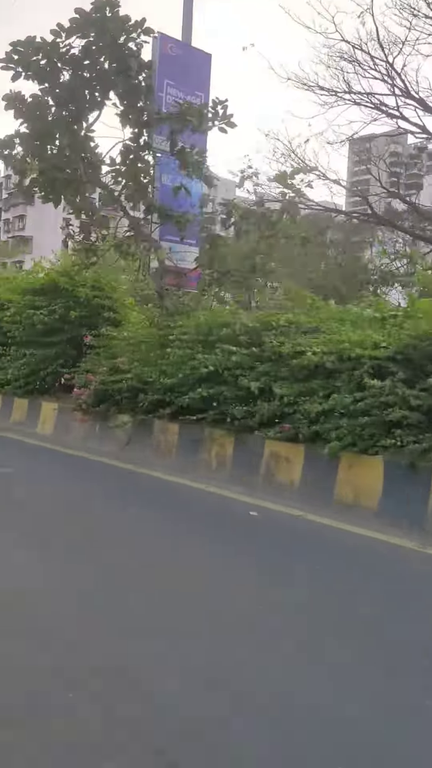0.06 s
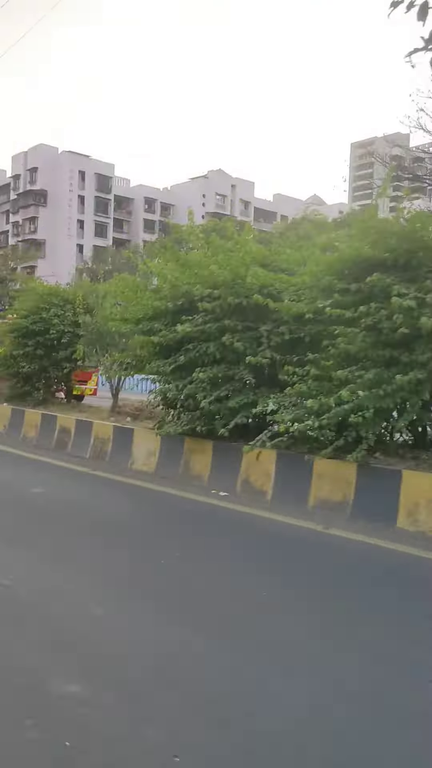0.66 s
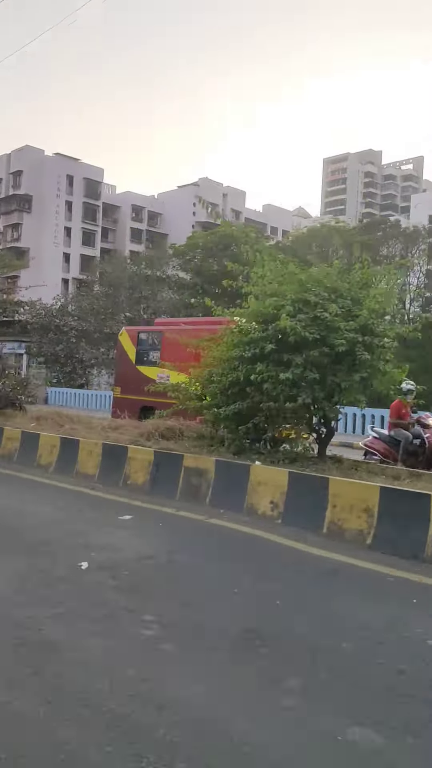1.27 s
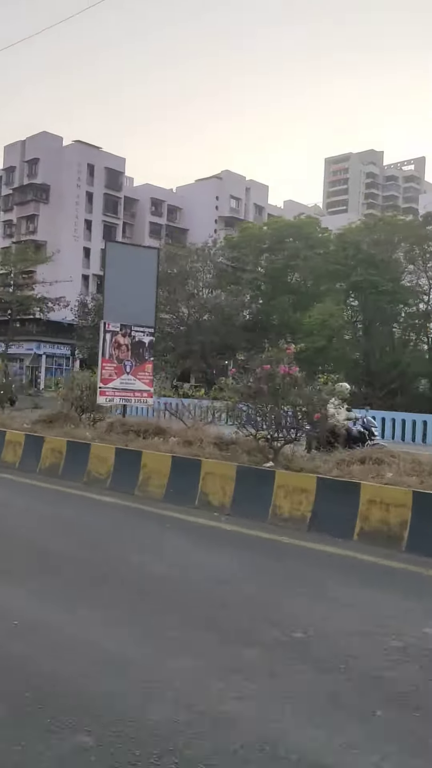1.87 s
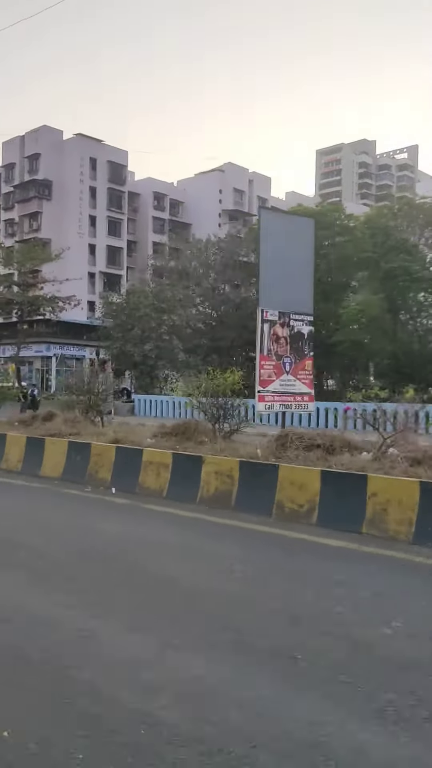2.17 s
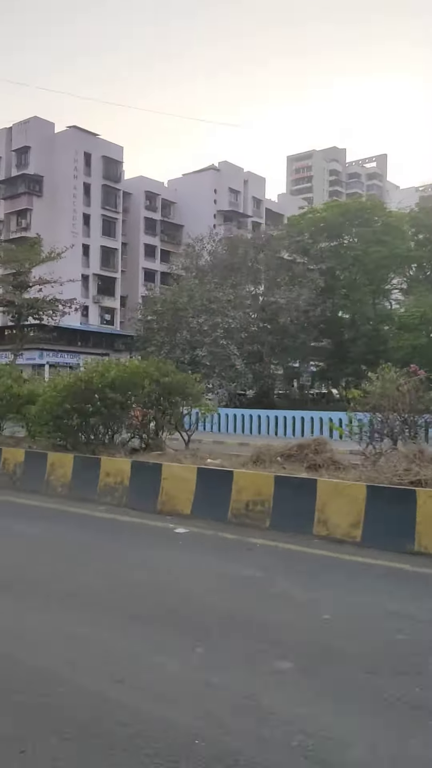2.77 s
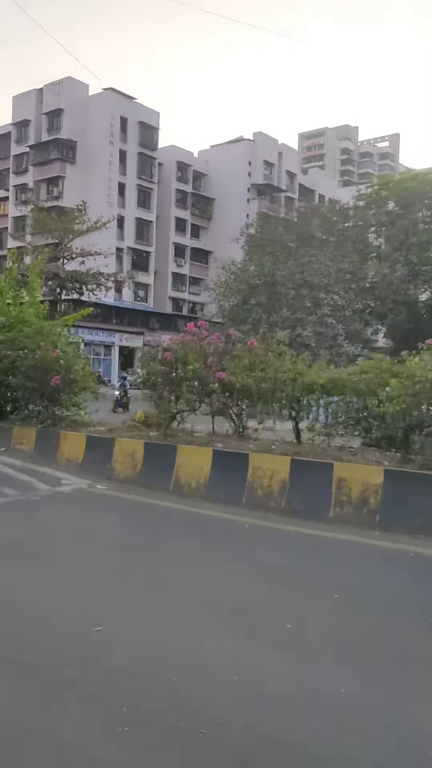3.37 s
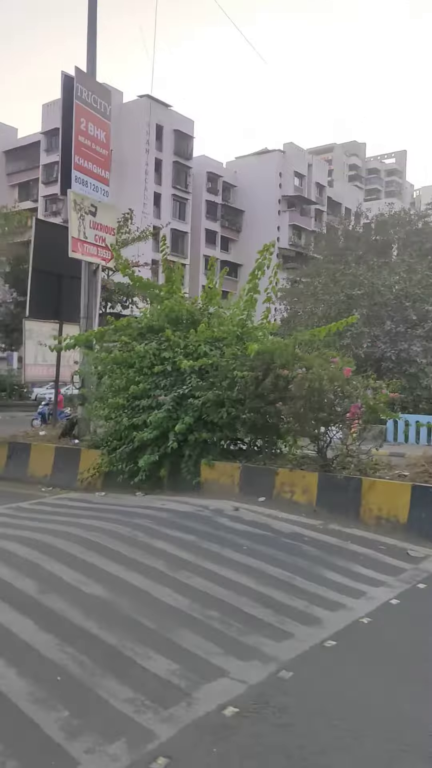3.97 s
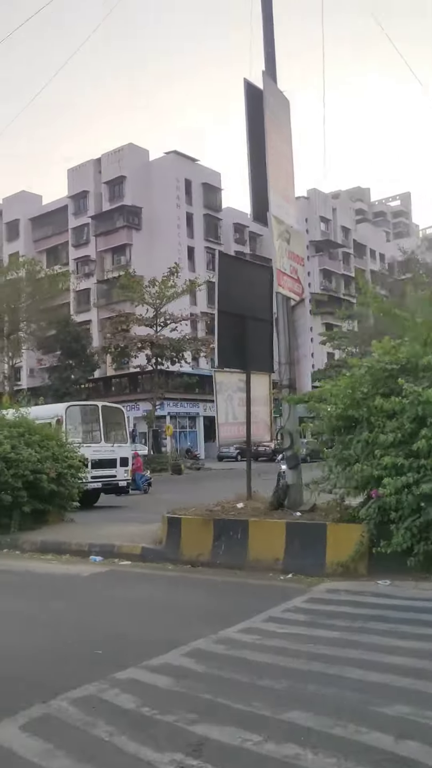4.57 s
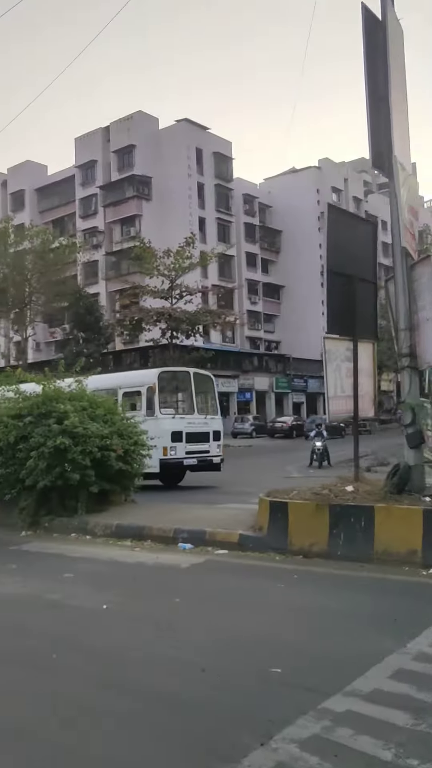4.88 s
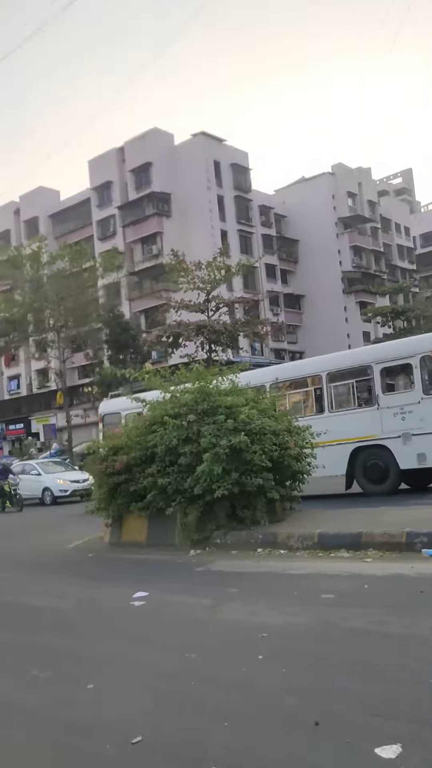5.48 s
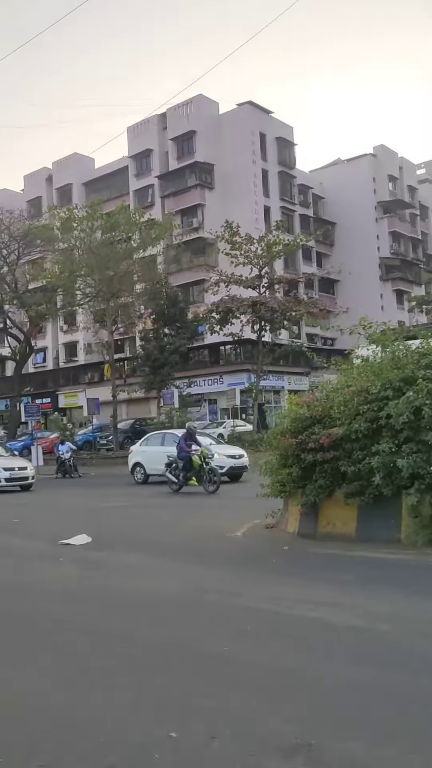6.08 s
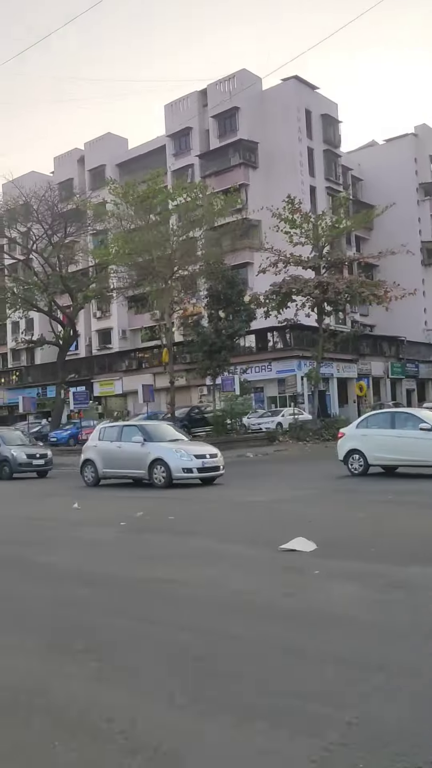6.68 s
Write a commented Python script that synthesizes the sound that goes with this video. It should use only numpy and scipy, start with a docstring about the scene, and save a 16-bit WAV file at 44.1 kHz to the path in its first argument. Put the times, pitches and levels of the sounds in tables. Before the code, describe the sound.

Inside a small open-sided vehicle on a city road, gusts thump and crackle on a phone's microphones over cabin rumble and tyre hiss. A horn toots twice as the wind eases. A brake squeals thinly and loose bodywork clacks. Then the throttle opens and the exhaust swells into a loud, low drone, with one more toot, turning to a rough bark with engine knock at the end.

```python
"""City ride in a small open-sided vehicle

Gusts buffet a phone's two microphones over the noise of tyres, cabin and gears. Horns toot, a spring
squeaks, a brake squeals, and loose parts clack and jingle. Then the throttle opens: the exhaust booms
in a loud, low drone that turns to a bark as the engine pulls and knocks."""
import sys
import numpy as np
from scipy import signal
from scipy.fft import rfft, irfft
from scipy.io import wavfile
from scipy.ndimage import uniform_filter1d

SR = 44100
rng = np.random.default_rng(int(sys.argv[2]) if len(sys.argv) > 2 else 0)


def generate_wav(signal):
    """Clip the signal to [-1, 1] and save it as 16-bit WAV at the path in sys.argv[1]."""
    frames = np.transpose(np.atleast_2d(signal))
    scaled = np.clip(frames, -1, 1) * 32767
    pcm = np.round(scaled).astype(np.int16)
    wavfile.write(sys.argv[1], SR, pcm)


N = 297013
TIME = np.arange(N) / SR

# How fast the engine fires: time_s, rate_hz
FIRING_RATE = [(4.4, 93), (4.8, 91), (5.07, 99.8), (5.3, 96.2), (5.58, 104), (5.89, 100.2), (6.02, 104),
               (6.27, 105.8), (6.45, 104), (6.73, 108.7)]
# The exhaust's deep boom, swelling as the throttle opens: time_s, level_db
BOOM_LEVEL = [(4.3, -26), (4.5, -21), (4.8, -27.5), (5.05, -12), (5.301, -12.5), (5.42, -10), (5.85, -11.5),
              (6.179, -11), (6.55, -19), (6.73, -19)]
# The exhaust's bark, growing as the engine works harder: time_s, level_db
BARK_LEVEL = [(4.6, -39.5), (5.9, -42), (6.07, -33.5), (6.45, -28), (6.68, -21.5)]
# Higher tones of the exhaust: multiple_of_firing_rate, share_of_boom_db, share_of_bark_db
EXHAUST_OVERTONES = [(1.5, -36.5, -14), (2.5, -25.5, -17), (3.5, -32.5, -13), (4, -27.5, -5.5),
                     (4.5, -40, -11.5), (5, -32.5, -15), (5.5, -45, -21), (6, -35, -18),
                     (6.5, -48.5, -19.5), (7, -35, -28), (7.5, -52.5, -26), (8, -44, -30.5),
                     (10, -49.5, -30)]
# Cabin panels buzzing along with one overtone: start_s, length_s, multiple_of_firing_rate, level_db
PANEL_BUZZES = [(4.98, 0.17, 4, -31.5), (5.328, 0.13, 3, -31.5), (5.3, 0.13, 4, -31), (5.72, 0.18, 6, -37),
                (5.925, 0.11, 6, -33), (5.882, 0.14, 5, -37)]
# The rasp of the engine's moving parts: time_s, relative_level_db
RASP_LEVEL = [(2.8, -63), (3.5, -45), (4.8, -38), (5.05, -34), (5.35, -32.5), (5.65, -39), (6.2, -36),
              (6.73, -33)]
# The rasp's mix of low and high sound: frequency_hz, gain_db
RASP_SPECTRUM = [(40, -26.5), (150, -3.5), (300, 1), (500, -0.5), (800, -8), (1250, -2), (1900, -8),
                 (2800, -9.5), (3300, -14.5), (4200, -25.5), (6300, -27.5), (8000, -43), (14000, -59.5)]
# The engine's high sizzle: frequency_hz, gain_db
SIZZLE_SPECTRUM = [(3000, -23), (4800, -8.5), (5800, 1.5), (6600, -2.5), (7200, -9), (7800, -17),
                   (10000, -18), (14000, -40)]
# Spells of engine knock: start_s, length_s, strength_db, highest_ring_boost_db
KNOCK_SPELLS = [(6.157, 0.054, -37, 3.5), (6.252, 0.053, -30.5, 0.5), (6.319, 0.036, -28.5, 7),
                (6.36, .028, -27, -3), (6.387, 0.11, -29, 7), (6.526, 0.076, -25.5, 2.5),
                (6.612, 0.11, -28, -2)]
# How the cylinder rings: pitch_hz, bandwidth_hz, gain_db, scatter_db, climb_hz_per_s
CYLINDER_RINGS = [(1600, 380, -5.5, 4, 200), (2540, 400, -2, 3, 540), (6720, 580, -14.5, 5, 0)]
# Gusts hitting the microphones: start_s, length_s, left_db, right_db
WIND_GUSTS = [(0.0, 0.065, -21.5, -15), (0.069, 0.05, -20, -11), (0.152, 0.027, -21.5, -13),
              (0.172, 0.04, -21, -11.5), (0.532, 0.033, -27, -13.5), (0.569, 0.1, -13, -11.5),
              (0.668, 0.096, -32, -17), (0.869, .02, -39, -20), (0.902, 0.087, -39, -21.5),
              (1.142, 0.078, -36, -19), (1.389, 0.015, -41, -13.5), (1.559, 0.019, -19, -45),
              (1.704, 0.026, -12.5, -38), (1.737, 0.024, -18, -36), (1.808, 0.056, -36, -18),
              (1.866, 0.059, -33, -11.5), (1.931, 0.082, -16, -27), (2.045, 0.038, -11, -15.5),
              (2.088, 0.053, -14.5, -16.5), (2.157, 0.043, -16, -15.5), (2.231, 0.035, -23, -13.5),
              (2.286, 0.087, -24, -38), (2.862, 0.2, -29, -19.5), (3.992, 0.076, -31, -25)]
# Swirling air at a microphone: frequency_hz, gain_db
WIND_SPECTRUM = [(20, -31), (50, -1.5), (100, 5.5), (170, 1.5), (350, -2.5), (600, -9), (1200, -26.5),
                 (2500, -39), (4000, -63), (6500, -59.5), (9000, -105.5)]
# The swirls that pop hardest: time_s, strength_db, left_minus_right_db, width_s
HARD_POPS = [(0.027, -8, -20, 0.0015), (0.045, -14, -16, 0.00029), (0.074, -11.5, -14, 0.0003),
             (0.085, -9, -18, 0.00032), (0.108, -10.5, -17, 0.00022), (0.164, -13, -12, 0.00029),
             (0.188, -9, -16, 0.00054), (0.307, -12.5, -24, 0.0011), (0.541, -7.5, -22, 0.00033),
             (0.570, -8.5, -15, .0005), (0.589, -9, -6, 0.00079), (0.620, -12, -12, 0.0003),
             (0.631, -8, -17, 0.00026), (0.636, -14, -15, 0.00032), (0.662, -14, -10, 0.00068),
             (0.742, -14.5, -13, 0.00048), (0.913, -8.5, -15, 0.002), (0.950, -7.5, -15, 0.002),
             (1.397, -14, -16, 0.00043), (1.706, -6, 20, 0.0017), (1.727, -5, 21, 0.00071),
             (1.832, -18, -18, 0.00035), (1.872, -7.5, -21, 0.00046), (1.884, -11, -18, 0.0004),
             (2.044, -4, 6, 0.0016), (2.068, -9, 0, 0.00088), (2.237, -12, -14, 0.00026),
             (2.248, -7, -14, 0.00077)]
# Horn toots: start_s, length_s, level_db, left_minus_right_db, treble_cut_db_per_khz
HORN_TOOTS = [(1.941, 0.098, -35, 2, 0.3), (2.157, 0.14, -39, 6.5, -0.3), (5.668, 0.13, -38, 4.5, -0.1)]
# Tones of the horn's buzzing diaphragm: multiple_of_pitch, gain_db
HORN_OVERTONES = [(2, 0), (3, 1), (4, 0), (5, -2.5), (6, -10), (7, 1.5), (8, -1), (9, -23), (10, -19.5),
                  (11, -15), (13, -16.5), (14, -21.5), (15, -14.5), (16, -17), (17, -22.5), (20, -22.5),
                  (26, -37), (28, -21.5), (32, -37), (37, -24.5)]
# The rattle of the horn's metal disc: frequency_hz, gain_db
RATTLE_SPECTRUM = [(400, -15), (900, -6), (1800, -4.5), (3200, 4), (4200, -10.5), (6300, -4), (7800, -18),
                   (15000, -14)]
# Blows on loose bodywork: time_s, peak_db, left_minus_right_db, treble_cutoff_hz
BODY_CLACKS = [(1.0145, -13, -11, 6500), (1.4485, -15, -12, 4500), (4.5604, -5, -12, 8000),
               (4.5635, -14.5, -12, 6000), (4.5673, -21, -12, 6000), (4.662, -15, -6, 2700),
               (5.5098, -11, -9, 6500), (5.5205, -18, -9, 2600), (5.556, -20, -9, 2600)]
# How that bodywork rings: pitch_hz, bandwidth_hz, gain_db
BODY_RINGS = [(880, 340, 1.5), (1390, 510, 0.5), (2020, 500, 1), (3020, 550, -3.5), (6400, 1030, -16)]
# Shivers of a small metal part: start_s, length_s, level_db, left_minus_right_db
METAL_JINGLES = [(0.098, 0.014, -56, 14), (0.537, 0.011, -55, 14), (0.599, 0.01, -57.5, 14),
                 (0.65, 0.012, -57, 14), (0.756, 0.007, -54, 14), (1.767, 0.008, -51, 10),
                 (1.822, 0.008, -52, 9), (1.875, 0.009, -47.5, 10)]
# How that part rings: frequency_hz, gain_db
JINGLE_SPECTRUM = [(1500, -30), (3400, 0), (4200, -10), (5400, -4), (6100, 1.5), (6800, -8), (7500, -26),
                   (14000, -38)]
# Cabin rumble and tyre hiss: time_s, rumble_db, relative_hiss_db
ROAD_LEVELS = [(0, -31, -40.5), (2.1, -30, -39), (2.7, -29, -41), (3.6, -30.5, -40), (4.0, -25, -39.5),
               (4.6, -28.5, -37.5), (6.73, -32, -40)]
# Their mix of low and high sound: frequency_hz, gain_db
ROAD_SPECTRUM = [(20, -18.5), (50, -8), (100, -1.5), (130, -2.5), (160, -2), (200, -5), (330, -13.5),
                 (750, -17), (1800, -25.5), (2900, -31), (4100, -51), (5200, -50.5), (6500, -44),
                 (7300, -64.5), (15000, -72)]
# The whirr of the gears: time_s, pitch_hz, level_db
GEAR_WHIRR = [(0, 2038, -59.5), (3.1, 2100, -48.5), (3.5, 2122, -44.5), (4.4, 2163, -44),
              (5.9, 2400, -54.5)]
# How alike the two microphones hear noise from all around: frequency_hz, likeness (0 to 1)
MIC_LIKENESS = [(60, 0.61), (290, 0.92), (640, 0.57), (1400, 0.037), (5000, 0.1)]


def engine():
    """Each firing drives the exhaust and a puff of rasp and sizzle from the moving parts."""
    firing_hz, = curves(FIRING_RATE)
    bark_db, = curves(BARK_LEVEL)
    rasp_db, = curves(RASP_LEVEL)
    angle = phase(firing_hz * (1 + 0.0048 * wobble(45)))  # one turn per firing
    load = 1 / (1 + undb(-24.5 - bark_db))  # 0 coasting, 1 pulling hard
    # Strong and weak firings alternate, more so as the engine pulls.
    limp = (0.086 + 0.294 * load) * np.cos(angle / 2)
    drone = exhaust(angle, firing_hz, bark_db, limp)
    pulse = 1 + (0.14 + 0.42 * load) * np.cos(angle)
    puffs = unit(pulse * (1 + 0.67 * limp)) * undb(1.1 * wobble(90))
    open_s = TIME - 4.18  # time since the throttle began to open
    throttle = np.clip(open_s / 0.58, 0, 1)
    rasp = close_noise(RASP_SPECTRUM, direct_db=2.5, lag_ms=0.13) * undb(rasp_db + 2.5) * pan(1.5)
    sizzle = close_noise(SIZZLE_SPECTRUM, direct_db=-0.5, lag_ms=0.074)
    sizzle *= undb(-56.5 + 0.95 * open_s) * pan(9.5)
    return throttle * (drone + puffs * sizzle) + puffs * rasp + knock(angle)


def exhaust(angle, firing_hz, bark_db, limp):
    """Firings boom through the pipe; its overtones bark under load and set cabin panels buzzing."""
    boom_db, = curves(BOOM_LEVEL)
    # The octave (twice the firing rate) gives way to the boom as the engine speeds up.
    octave_db = boom_db - 7.5 - 0.41 * (firing_hz - 96.3)
    octave = np.hypot(undb(octave_db), undb(bark_db + 6)) * undb(1.5 * wobble(5))
    boom = undb(boom_db) * np.sin(angle) - octave * np.sin(2 * angle)
    upper = undb(bark_db) * np.sin(3 * angle)
    for start, length, multiple, db in PANEL_BUZZES:
        upper += undb(db) * gate(start, length, edge=0.074) * np.sin(multiple * angle)
    for multiple, boom_share_db, bark_share_db in EXHAUST_OVERTONES:
        size = undb(boom_db + boom_share_db) + undb(bark_db + bark_share_db)
        size *= undb(3.2 * wobble(7) - 3.5)
        upper += size * np.sin(multiple * angle + rng.uniform(0, 2 * np.pi))
    uneven = 1 + 0.014 * np.sin(angle / 2) + 0.012 * wobble(100)  # no two firings are alike
    upper *= 1 + limp + 0.2 * wobble(130)
    return from_left(np.sqrt(2) * uneven * (boom + upper), lag_ms=0.14)


def knock(angle):
    """Under load each firing raps the cylinder; its rings vary by chance and the lower two climb."""
    firings = np.flatnonzero(np.diff(angle // (2 * np.pi)))
    chances = np.clip(rng.standard_normal((len(firings), len(CYLINDER_RINGS), 2)), -2, 1.3)
    force = sum(undb(db) * gate(start, length, edge=0.012) for start, length, db, _ in KNOCK_SPELLS)
    boost_db = sum(db * gate(start, length, edge=0.012) for start, length, _, db in KNOCK_SPELLS)
    t = TIME[:SR // 100]
    raps = np.zeros(N + len(t))
    for i, chance in zip(firings, chances):
        knocking_s = max(TIME[i] - KNOCK_SPELLS[0][0], 0)
        for k, (hz, width, db, scatter_db, climb) in enumerate(CYLINDER_RINGS):
            strength, detune = chance[k]
            pitch_hz = (hz + climb * knocking_s) * (1 + 0.037 * detune)
            is_highest = k == len(CYLINDER_RINGS) - 1
            size = force[i] * undb(db + scatter_db * strength + boost_db[i] * is_highest)
            age = np.pi * width * t
            raps[i:i + len(t)] += size * age * np.exp(1 - age) * np.sin(2 * np.pi * pitch_hz * t)
    stereo = from_left(raps[:N], lag_ms=0.041) * pan(1)
    return stereo + undb(-5.5) * street_echo(stereo, fade_s=0.031)


def wind(mic):
    """Swirls of air break on one microphone (0 left, 1 right); harder gusts crackle more."""
    power = 0
    attack_s, sag_db_per_s = 0.0028, 32
    for start, length, *mic_db in WIND_GUSTS:
        sag_db = sag_db_per_s * np.maximum(TIME - start, 0)
        swell = envelope(start, attack_s, hold=length - attack_s, release=0.017)
        power += (undb(mic_db[mic] - sag_db) * swell) ** 2
    # Small swirls fill the gaps between gusts and die down as the air calms.
    calm_db = 6 * np.maximum(TIME - 2.14, 0)
    swirl_db = -35.5 + 6 * np.minimum(wobble(22), 1.5) - calm_db
    force = np.sqrt(power + (undb(swirl_db) * pan(-4)[mic]) ** 2)
    thud, flutter = split(unit(colour(rng.standard_normal(N), WIND_SPECTRUM)), hz=398)
    thud /= np.sqrt(uniform_filter1d(thud ** 2, size=1000) + 0.23)  # evens out neighbouring thuds
    crackle = unit(undb(2.9 * wobble(260))) * (force / undb(-7)) ** 0.36
    hard_pops, small_pops = wind_pops(mic)
    pressure = force * (undb(-1) * thud + undb(1) * crackle * flutter + undb(9) * small_pops) + hard_pops
    # The microphone overloads softly and lets little of the treble through.
    return low_pass(0.85 * np.tanh(pressure / 0.85), hz=6800, order=8)


def wind_pops(mic, pops_per_s=40):
    """Each tight swirl is one swing of pressure: a few hard pops and a random train of small ones."""
    t = TIME[:SR // 25] - 0.02

    def swing(width_s):
        return t / width_s / (1 + (t / width_s) ** 2) ** 1.66

    hard = np.zeros(N)
    for time_s, db, pan_db, width_s in HARD_POPS:
        i = max(int(time_s * SR) - len(t) // 2, 0)
        shape = swing(width_s)
        side_gain = min(pan(2 * pan_db)[mic, 0], 1)
        hard[i:i + len(t)] += shape / np.max(shape) * undb(db) * side_gain
    kicks = (rng.random(N) < pops_per_s / SR) * rng.uniform(-1.6, 1.74, N)
    return split(hard, hz=75)[1], signal.fftconvolve(kicks, swing(width_s=0.00032), mode="same")


def horns(pitch_hz=420.6):
    """A buzzing diaphragm strikes a disc once a cycle; the disc rattles and rings, the street echoes."""
    multiples = np.arange(2, 38)
    overtone_db = np.interp(multiples, *np.transpose(HORN_OVERTONES))
    rattle = surrounding_noise(RATTLE_SPECTRUM) * undb(-10.5)
    disc = rattle + whirr(hz=3500, wander=0.014, throb_hz=40, depth=0.3, lag_ms=0.1) * undb(-15)
    toots = np.zeros((2, N))
    for start, length, db, pan_db, treble_cut in HORN_TOOTS:
        swell = envelope(start - 0.006, attack=0.015, hold=length - 0.022, release=0.024)
        on = swell > 0.002
        angle = phase(pitch_hz * (1 + 0.003 * wobble(900)[on]))
        strikes = 1 + 0.096 * wobble(420)[on]  # no two are equally hard
        gains = undb(overtone_db - treble_cut * multiples * pitch_hz / 1000)
        angles = np.outer(multiples, angle) + rng.uniform(0, 2 * np.pi, (len(multiples), 1))
        for mic in range(2):
            # Moving reflections make each overtone waver by itself.
            drift = np.outer(rng.uniform(20, 140, len(multiples)), TIME[on])
            drift += rng.uniform(0, 2 * np.pi, (len(multiples), 1))
            overtones = (1 + 0.38 * np.sin(drift)) * np.sin(angles + 0.98 * np.cos(drift))
            buzz = strikes * unit(gains @ overtones) + disc[mic, on] * (1 + 0.55 * np.cos(angle))
            toots[mic, on] += buzz * swell[on] * undb(db) * pan(pan_db)[mic]
    return toots + undb(-8) * street_echo(toots, fade_s=0.32)


def clacks():
    """Bumps knock loose bodywork: one sharp blow and a brief chatter, with hardly any ringing."""
    t = TIME[:SR // 10]
    stereo = np.zeros((2, N))
    for time_s, peak_db, pan_db, cutoff_hz in BODY_CLACKS:
        blow = 0.042 * rng.standard_normal(len(t)) * np.exp(-t / 0.0036)
        blow[0] += 1
        rings = [(-1) ** k * undb(db) * ring(blow, hz, width)
                 for k, (hz, width, db) in enumerate(BODY_RINGS)]
        hit = low_pass(sum(rings), cutoff_hz)
        i = int(time_s * SR)
        stereo[:, i:i + len(t)] += hit / np.max(np.abs(hit)) * undb(peak_db) * unit(pan(pan_db))
    return stereo


def brake(level_db, pitch_hz=7785):
    """A brake rings at one high pitch and its octave, blurred by unsteady grip, until the pad lets go."""
    sides = []
    for octave_db in (-6, -19):  # left, right
        grip = 1 + 0.008 * wobble(700) + 0.002 * wobble(25)
        angle = phase(pitch_hz * grip)
        octave = undb(octave_db + 2.6 * wobble(300)) * np.sin(2 * angle + 0.7 * wobble(900))
        roughness = unit(undb(2 * wobble(260)))
        sides.append(roughness * (np.sin(angle) + octave))
    swell = envelope(start=3.675, attack=0.03, hold=0.305, release=0.018)
    return np.array(sides) * undb(level_db) * swell


def jingles():
    """A small loose metal part on the left shivers in brief, high rings."""
    swell = sum(undb(db) * pan(pan_db) * envelope(start, attack=0.003, hold=length, release=0.006)
                for start, length, db, pan_db in METAL_JINGLES)
    return close_noise(JINGLE_SPECTRUM, direct_db=1.5, lag_ms=0.075) * swell


def spring(level_db):
    """A spring squeaks briefly."""
    tone = whirr(hz=3600, wander=0.0043, throb_hz=30.2, depth=0.2, lag_ms=0.063)
    return tone * undb(level_db) * envelope(start=2.68, attack=0.02, hold=0.038, release=0.012)


def far_horn(level_db):
    """From a horn far down the road, only the blurred ring of its disc arrives."""
    tone = whirr(hz=2930, wander=0.03, throb_hz=20, depth=0.2, lag_ms=0.054)
    return tone * undb(level_db) * envelope(start=1.03, attack=0.03, hold=0.32, release=0.03)


def gears():
    """Meshing gears whirr, rising in pitch with road speed."""
    hz, db = curves(GEAR_WHIRR)
    return undb(db) * whirr(hz, wander=0.05, throb_hz=27, depth=0.55, lag_ms=0.12)


def road():
    """The cabin rumbles and the tyres hiss, both fluttering with the road surface."""
    rumble_db, hiss_db = curves(ROAD_LEVELS)
    rumble, _ = split(surrounding_noise(ROAD_SPECTRUM), hz=660)
    rumble = unit(rumble) * undb(rumble_db + 0.77 * wobble(14))
    _, hiss = split(close_noise(ROAD_SPECTRUM, direct_db=-6.5, lag_ms=0.428), hz=640)
    return rumble + unit(hiss) * undb(hiss_db + 1.5 + 0.36 * wobble(25))


def street_echo(x, fade_s):
    """Scattered echoes from kerb, traffic and house fronts, falling 60 dB in fade_s."""
    tail = rng.standard_normal((2, SR)) * undb(-60 * TIME[:SR] / fade_s)
    return signal.fftconvolve(x, tail / np.sqrt(np.sum(tail[0] ** 2)), axes=1)[:, :N]


def whirr(hz, wander, throb_hz, depth, lag_ms):
    """A blurred tone of rubbing or meshing metal, with a throb in its loudness."""
    direct, left, right = (np.sin(phase(hz * (1 + wander * wobble(700)))) for _ in range(3))
    tone = unit(from_left(direct, lag_ms) + 0.78 * np.array([left, right]))
    throb = phase(throb_hz * hz / np.max(hz) * (1 + 0.088 * wobble(15)))
    return tone * unit(1 + depth * np.cos(throb))


def close_noise(spectrum, direct_db, lag_ms):
    """Noise from nearby: a direct path to both microphones, plus scatter from all around."""
    direct = unit(colour(rng.standard_normal(N), spectrum))
    return unit(surrounding_noise(spectrum) + undb(direct_db) * from_left(direct, lag_ms))


def surrounding_noise(spectrum):
    """Noise from all around: the two microphones agree only on the low sounds."""
    likeness = np.clip(on_bins(MIC_LIKENESS), 0, 1)
    shared, opposed = rfft(rng.standard_normal((2, N)))
    shared *= np.sqrt(1 + likeness)
    opposed *= np.sqrt(1 - likeness)
    return unit(colour(irfft(np.array([shared + opposed, shared - opposed]), N), spectrum))


def from_left(x, lag_ms):
    """A sound that reaches the right microphone lag_ms after the left."""
    hz = np.arange(N // 2 + 1) * SR / N
    delayed = irfft(rfft(x) * np.exp(-2j * np.pi * hz * lag_ms / 1000), N)
    return np.array([x, delayed])


def pan(db):
    """Left and right gains, with the left louder by db."""
    return undb(np.array([db, -db]).reshape(2, -1) / 2)


def envelope(start, attack, hold, release):
    """Rise, hold, then die away; all times are in seconds."""
    t = TIME - start
    return np.clip(t / attack, 0, 1) * np.exp(-np.maximum(t - attack - hold, 0) / release)


def gate(start, length, edge):
    """Switch on for a while, with soft edges; all times are in seconds."""
    fade_in = np.clip((TIME - start) / edge + 0.5, 0, 1)
    return fade_in * np.clip((start + length - TIME) / edge + 0.5, 0, 1)


def wobble(rate_hz):
    """A smooth random curve that strays about 1 either side of zero."""
    step = max(int(SR / rate_hz), 1)
    stairs = np.repeat(rng.standard_normal(N // step + 1), step)
    return 1.3 * uniform_filter1d(uniform_filter1d(stairs, step), step)[:N]


def phase(hz):
    """The running angle of a wave whose pitch can change."""
    return 2 * np.pi * np.cumsum(hz) / SR


def curves(table):
    """Join a table's timed rows with straight lines, one curve per value column."""
    times, *columns = np.transpose(table)
    return [np.interp(TIME, times, column) for column in columns]


def on_bins(table):
    """Read a frequency table at every frequency of the Fourier transform."""
    hz, value = np.transpose(table)
    return np.interp(np.log(np.arange(N // 2 + 1) * SR / N + 1), np.log(hz), value)


def colour(x, spectrum):
    """Turn each frequency up or down as the table says."""
    return irfft(rfft(x) * undb(on_bins(spectrum)), N)


def ring(x, hz, width):
    """Let a sound ring in a band around one pitch."""
    return signal.lfilter(*signal.iirpeak(hz, hz / width, fs=SR), x)


def low_pass(x, hz, order=2):
    """Soften everything above a frequency."""
    return signal.sosfilt(signal.butter(order, hz, fs=SR, output="sos"), x)


def split(x, hz):
    """The parts below and above a frequency; filtering both ways keeps them in step."""
    low = signal.sosfiltfilt(signal.butter(2, hz, fs=SR, output="sos"), x)
    return low, x - low


def undb(db):
    """Turn decibels into a gain."""
    return 10 ** (np.asarray(db) / 20)


def unit(x):
    """Scale to an average power of 1."""
    return x / np.sqrt(np.mean(x ** 2))


def scene():
    """Everything as it reaches the two microphones."""
    gusts = np.array([wind(mic) for mic in range(2)])
    squeal = brake(level_db=-39)
    driving = road() + engine() + gears()
    traffic = horns() + far_horn(level_db=-53.5)
    loose_parts = spring(level_db=-55.5) + clacks() + jingles()
    return driving + gusts + traffic + squeal + loose_parts


def record(dry):
    """The phone cuts the highest treble; the sound starts and stops softly."""
    fade_s, top_hz = 0.004, 15800
    ends = gate(fade_s / 2, N / SR - fade_s, edge=fade_s)
    return signal.sosfilt(signal.ellip(10, 0.2, 80, top_hz, fs=SR, output="sos"), dry * ends)


dry = scene()
out = record(dry)
generate_wav(out)
```